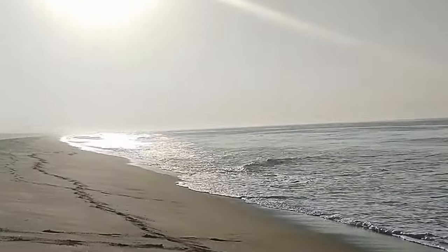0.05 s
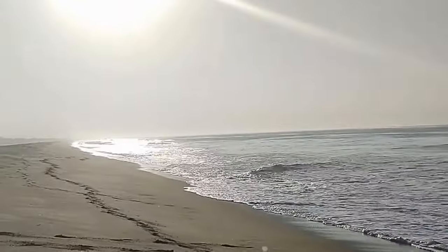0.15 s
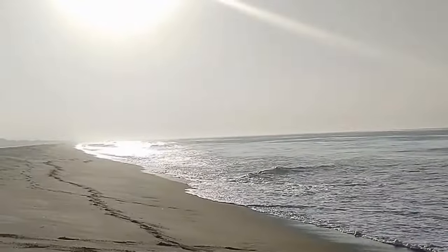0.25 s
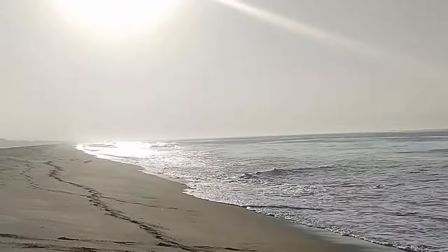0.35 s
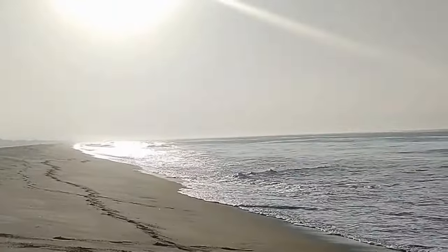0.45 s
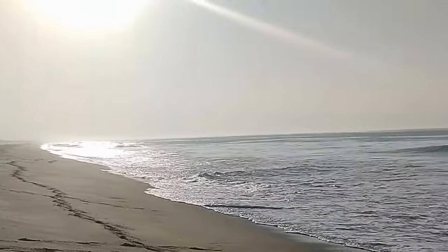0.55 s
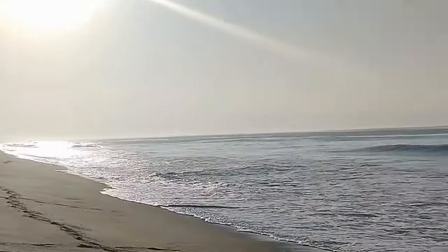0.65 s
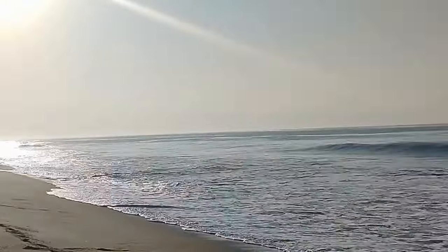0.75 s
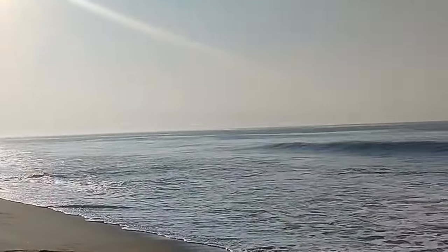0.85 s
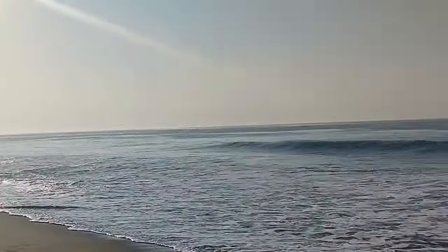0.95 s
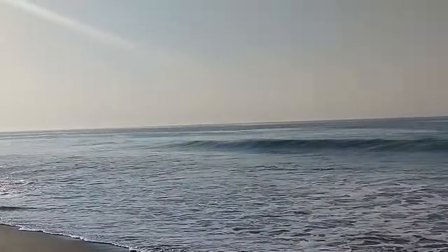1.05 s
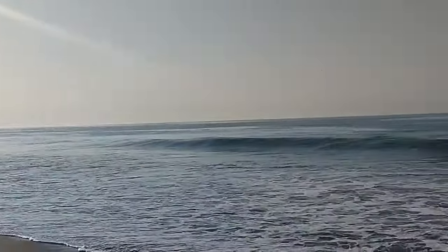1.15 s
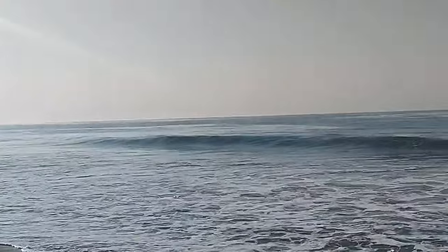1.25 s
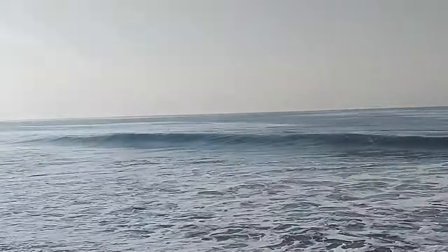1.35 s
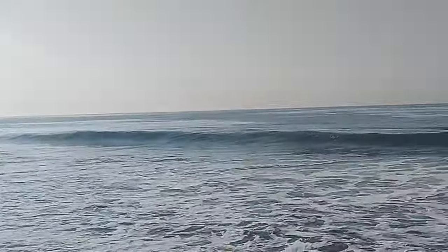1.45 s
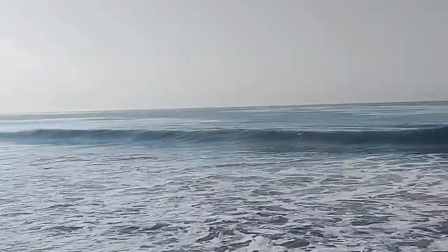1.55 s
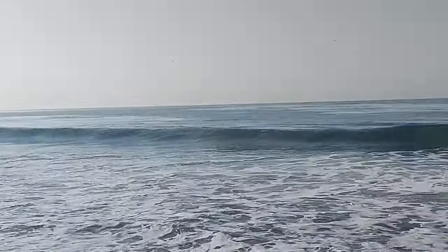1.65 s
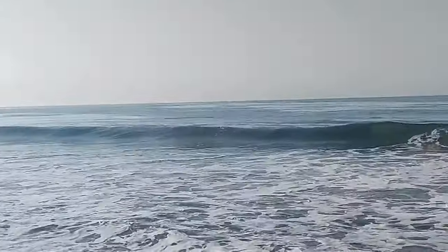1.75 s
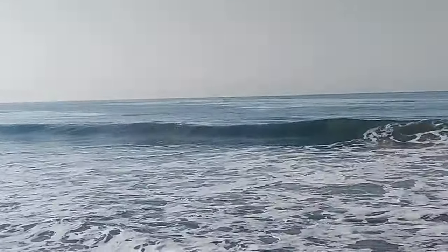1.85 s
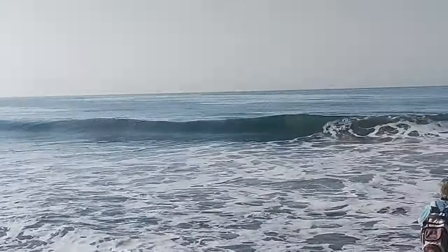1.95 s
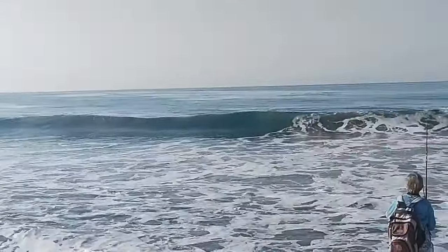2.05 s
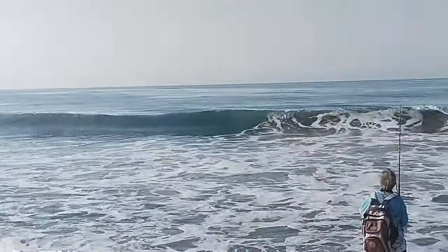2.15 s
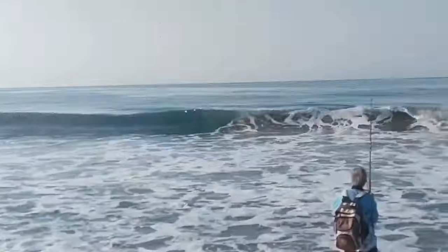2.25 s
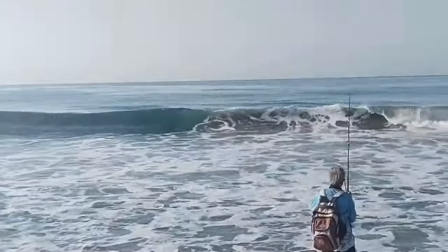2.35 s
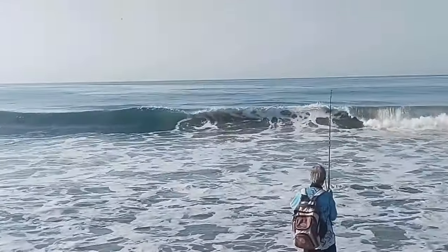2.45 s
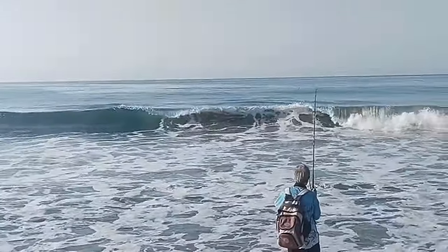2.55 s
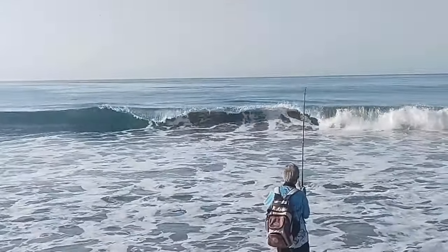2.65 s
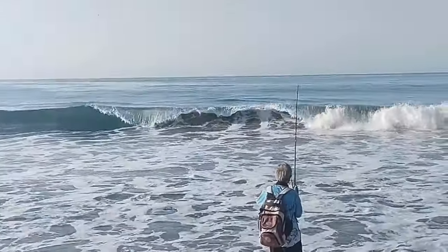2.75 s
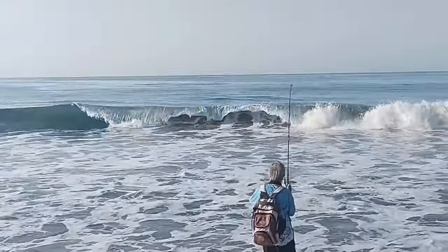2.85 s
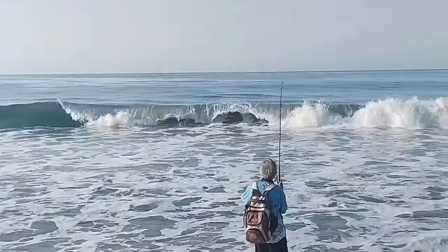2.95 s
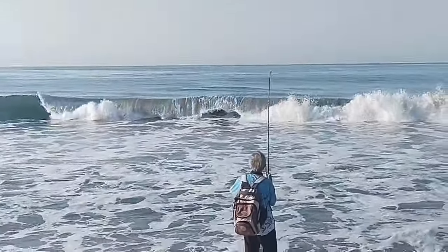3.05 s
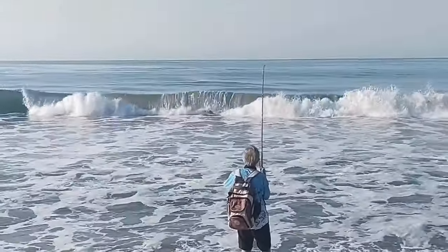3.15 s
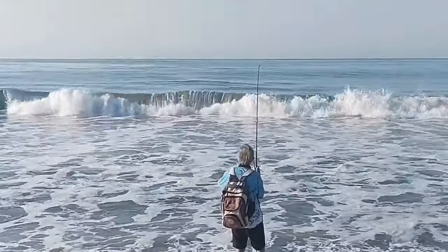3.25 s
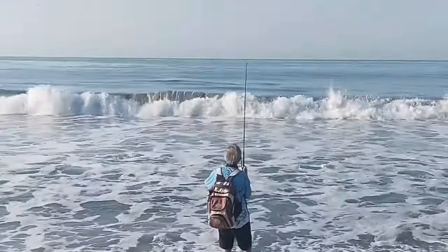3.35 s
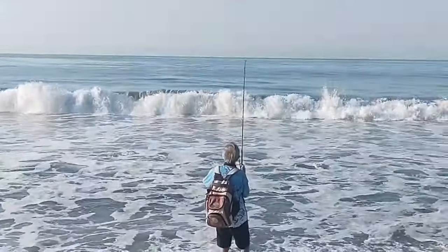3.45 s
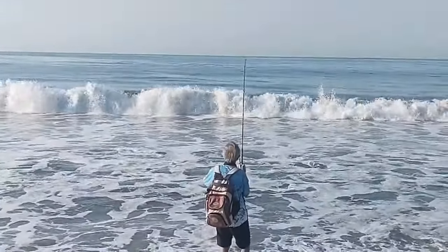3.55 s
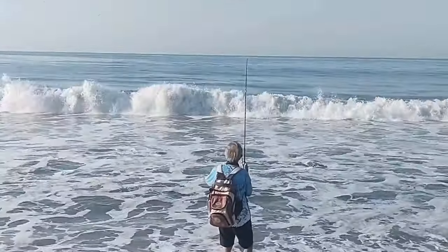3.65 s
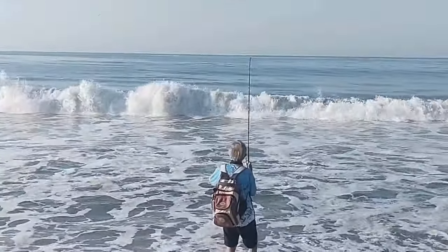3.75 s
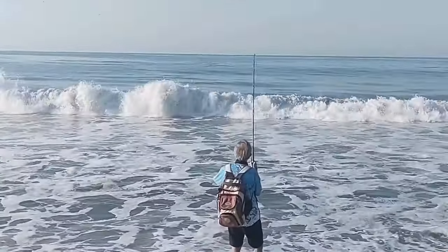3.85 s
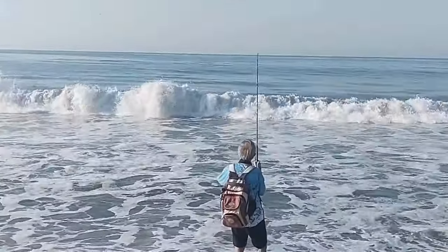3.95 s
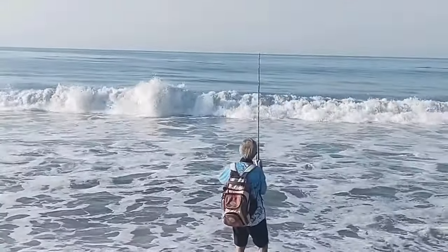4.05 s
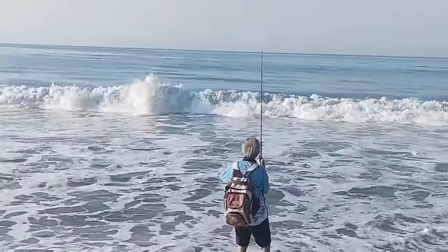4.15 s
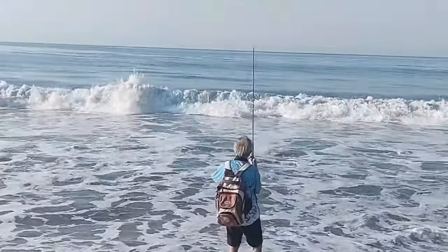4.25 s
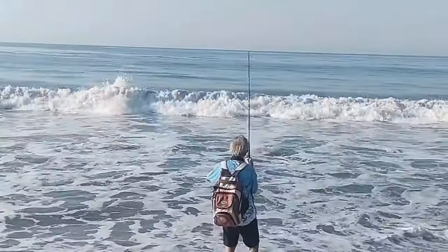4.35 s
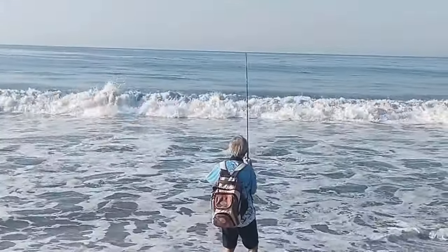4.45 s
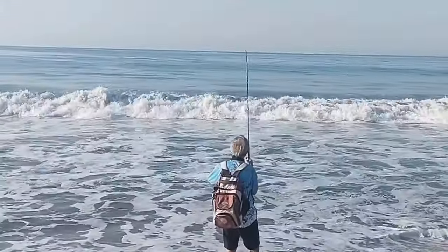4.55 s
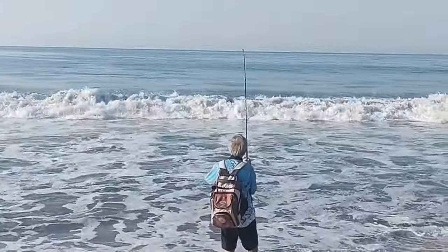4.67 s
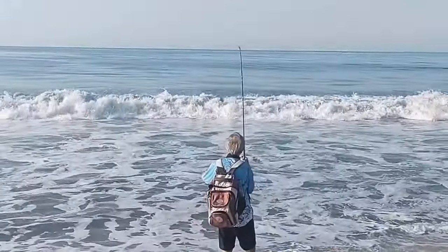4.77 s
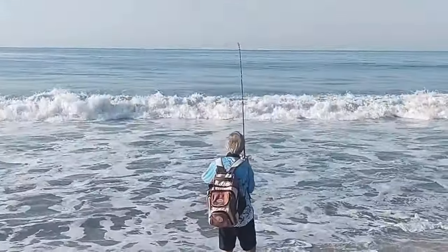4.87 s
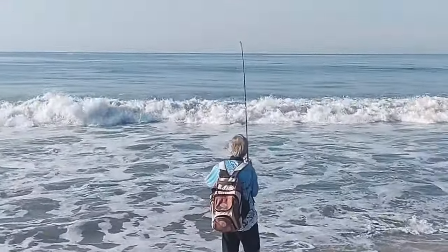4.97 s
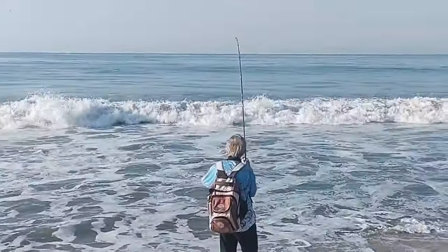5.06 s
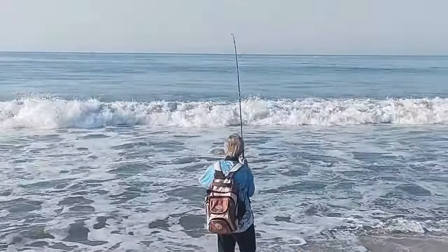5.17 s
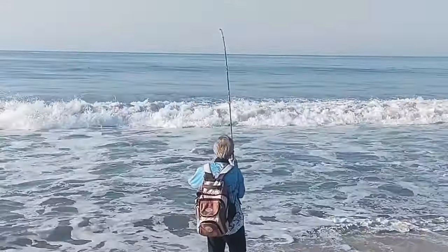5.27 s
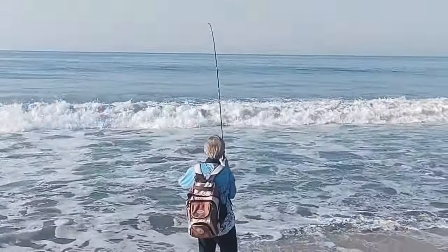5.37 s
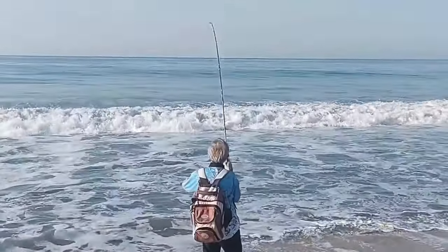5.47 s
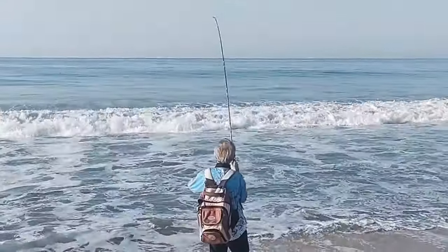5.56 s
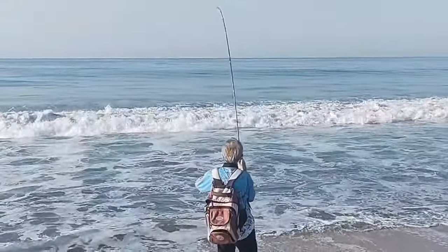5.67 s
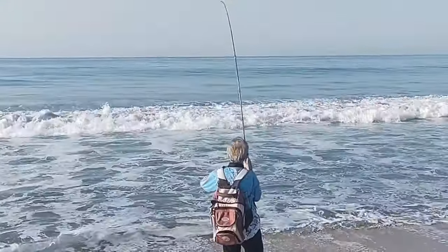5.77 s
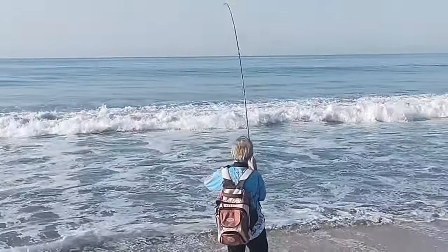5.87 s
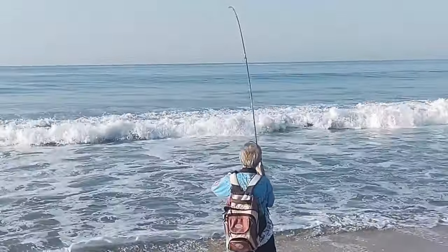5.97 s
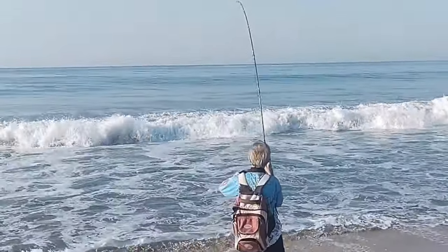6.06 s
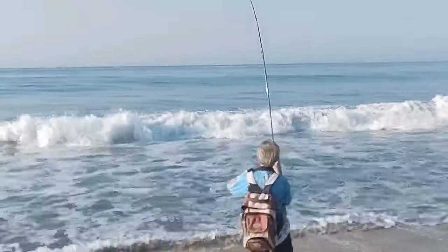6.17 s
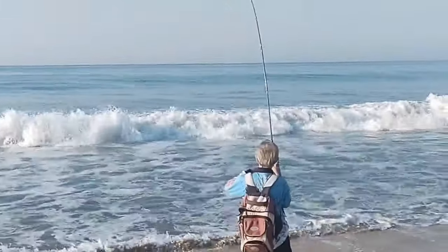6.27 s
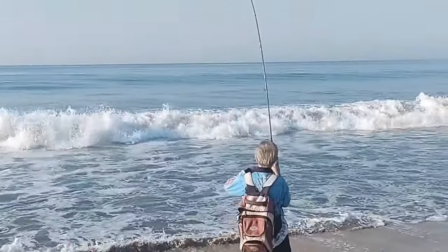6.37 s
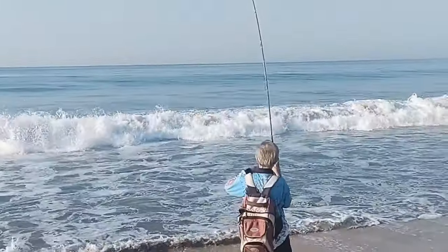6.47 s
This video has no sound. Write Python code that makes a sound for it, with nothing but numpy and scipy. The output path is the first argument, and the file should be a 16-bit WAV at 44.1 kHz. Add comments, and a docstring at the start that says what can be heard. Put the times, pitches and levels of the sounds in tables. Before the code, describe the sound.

Quiet hush of distant surf and light wind, then a wave gurgles, crashes with dull thuds, rolls in foaming, and fizzing water runs up sand.

```python
"""A low hush of far breakers with a dying hiss and light wind opens the scene on a flat sandy beach.
A wave trickles and spills at its crest, gurgles, plunges with thuds and rolls in as white water.
Then a thin fizzing swash runs up the sand on the right. Water and wind are shaped stereo noise;
thuds are decaying sines, the gurgle a gliding narrow band, the pops random clicks.
The wet sand mirrors the breaker with a moving delay that hollows its sound."""
import sys
import numpy as np
from scipy import signal
from scipy.fft import rfft, irfft, next_fast_len
from scipy.io import wavfile
from scipy.ndimage import uniform_filter1d, map_coordinates

SR = 44100
rng = np.random.default_rng(int(sys.argv[2]) if len(sys.argv) > 2 else 0)


def unload_wav(signal):
    """Save mono or channel-first audio to the path in sys.argv[1] as 16-bit WAV at rate SR, clipped to [-1, 1]."""
    wavfile.write(
        sys.argv[1],
        SR,
        np.round(np.clip(np.atleast_2d(signal).T, -1, 1) * 32767).astype(np.int16),
    )


N = 287091

# bearing of the loudest water, travelling to the right: time_s, left_lead_ms
BEARING = [(2.35, 0.13), (3, -0.266), (3.4, -0.24), (3.85, -0.43), (4.25, -0.56), (4.6, -0.41), (6.5, -0.6)]
# likeness of the two ports: frequency_hz, correlation (0-1)
LIKENESS = [(250, 0.7), (350, 0.82), (550, 1), (780, 0.63), (1050, 0.48), (2000, 0.1), (3500, 0),
            (5500, 0.1), (7000, 0.6), (10000, 0.98)]
# relative noise spectra of drops, large bubbles and fine foam: frequency_hz, density_db
SPATTER_SPECTRUM = [(1000, -8.5), (1350, 1.5), (1680, -0.5), (1950, 4.5), (2300, 1.5), (2750, -2.5),
                    (3000, -14), (3500, -20.5), (4300, -24.5), (7000, -28.5), (12000, -39)]
CHURN_SPECTRUM = [(230, -12.5), (360, -1.8), (480, 0.4), (620, 0), (800, -1), (1000, -7.5), (1200, -10),
                  (1600, -21)]
FIZZ_SPECTRUM = [(3500, -17), (4300, -10), (5100, -0.5), (6800, 2), (8500, -3), (11000, -7.5), (15000, -10),
                 (16000, -26.5)]
# the crest spills over three times, its body louder each time: start_s, length_s, body_db, spatter_db
SPILLS = [(1.34, 0.31, -46.5, -51), (1.67, 0.19, -41, -40), (1.87, 0.13, -35.5, -51)]
# sections of the lip hit the water: start_s, length_s, churn_db, splash_db, spray_db
FALLS = [(2.355, 0.23, -39, -47.5, -67), (2.53, 0.13, -39, -51, -62.5), (2.98, 0.094, -36, -48.5, -62),
         (3.09, 0.34, -36.5, -45.5, -63.5), (3.25, 0.05, -36, -44, -52.5), (3.45, 0.13, -39.5, -48.5, -63),
         (3.84, 0.027, -34.5, -41.5, -61), (3.97, 0.26, -36, -44.5, -59), (4.06, 0.17, -36.5, -42.5, -55),
         (4.3, 0.12, -34, -39.5, -51.5), (4.53, 0.064, -37.5, -48, -51.5)]
# surges that overrun the sheet of water: start_s, length_s, wash_db, fizz_db, froth_db
SURGES = [(4.07, 0.23, -42.5, -54, -57), (4.3, 0.19, -41, -54, -55.5), (4.5, 0.06, -34.5, -53, -59),
          (5.17, 0.11, -47, -53.5, -73), (5.5, 0.05, -58, -61, -76), (6.32, 0.23, -41, -66, -67)]

# wave lands, its air pocket collapses, only rolling white water is left
LANDING_S, COLLAPSE_S, SPENT_S = 2.345, 2.45, 4.33
# the sheet reaches the sand and spreads
SWASH_S, SWASH_SPREAD_S = 3.74, 0.62
FALL_ATTACK_S, FALL_DB_PER_S = 0.024, 68
SPILL_ATTACK_S, SPILL_FALL_DB_PER_S = 0.21, 34
SURGE_ATTACK_S, SURGE_FALL_DB_PER_S = 0.05, 66


def amp(db):
    """Decibels to gain."""
    return 10 ** (np.asarray(db) / 20)


def unit(x):
    """Scale to rms 1."""
    return x / np.sqrt(np.mean(x ** 2) + 1e-20)


def along(points, hz):
    """(Hz, value) points read on a log frequency axis."""
    f, v = np.transpose(points)
    return np.interp(np.log(hz + 1), np.log(f + 1), v)


def curves(rows):
    """One value per sample for each column after the time."""
    s, *cols = np.transpose(rows)
    return [np.interp(np.arange(N) / SR, s, c) for c in cols]


def since(at_s):
    """Seconds gone by since a time; 0 before it."""
    return np.maximum(np.arange(N) / SR - at_s, 0)


def fade_in(at_s, length_s):
    """Smooth tanh step from 0 to 1, centred on a time."""
    return .5 + .5 * np.tanh((np.arange(N) / SR - at_s) / length_s)


def swell(start_s, length_s, attack_s, fall_db_per_s):
    """Attack centred on the start, hold, release at a steady dB rate."""
    return fade_in(start_s, attack_s) * amp(-fall_db_per_s * since(start_s + length_s))


def swells(events, attack_s, fall_db_per_s):
    """One envelope per level column of (start, length, dB, ..) rows; overlaps add in power."""
    rows = np.array(events)
    shapes = np.array([swell(start_s, length_s, attack_s, fall_db_per_s)
                       for start_s, length_s in rows[:, :2]])
    powers = amp(rows[:, 2:].T) ** 2
    return np.sqrt(powers @ shapes ** 2)


def wobble(knots_per_s):
    """Smooth random curve: a spline through normal random knots."""
    knots = rng.standard_normal(int(N * knots_per_s / SR) + 4)
    return map_coordinates(knots, [np.arange(N) * knots_per_s / SR])


def filtered(x, response):
    """x times a zero-phase response of frequency."""
    m = next_fast_len(N + SR // 2)
    return irfft(rfft(x, m) * response(np.fft.rfftfreq(m, 1 / SR)), m)[..., :N]


def brightened(pair, edge_hz, gain):
    """The part above an edge follows its own gain."""
    low = filtered(pair, lambda hz: 1 / (1 + (hz / edge_hz) ** 12))
    return low + gain * (pair - low)


def colour(spectrum, hz):
    """Gain of a spectrum that falls away steeply beyond its ends."""
    skirts = np.minimum(hz / spectrum[0][0], 1) * np.minimum(spectrum[-1][0] / (hz + 1), 1)
    return amp(along(spectrum, hz)) * skirts ** 4


def rush(spectrum, alike, patchy_db):
    """Stereo noise of rms 1 in patches: bubble clouds of different sizes come and go."""
    z = signal.stft(rng.standard_normal((2, N)), nperseg=512)[2]
    field = uniform_filter1d(rng.standard_normal(z.shape[1:]), size=7, axis=0)
    field = uniform_filter1d(field, size=14, axis=1)
    pair = signal.istft(z * amp(patchy_db * unit(field)), nperseg=512)[1][:, :N]

    def mid_side_gains(hz):
        # splitting power by this angle gives the wanted correlation
        angle = np.arccos(np.clip(along(alike, hz), -1, 1)) / 2
        return colour(spectrum, hz) * np.array([np.cos(angle), np.sin(angle)])

    mid, side = filtered(pair, mid_side_gains)
    return unit(np.array([mid + side, mid - side]))


def delayed(x, ms):
    """One channel, late by a time that may move."""
    return map_coordinates(x, [np.arange(N) - ms * SR / 1000], mode="mirror")


def arriving(pair, left_lead_ms):
    """Sound from one side reaches the nearer port first."""
    return np.array([delayed(pair[0], -left_lead_ms / 2), delayed(pair[1], left_lead_ms / 2)])


def plunge(level_db=2, tumble_db=-49.0, build_s=0.072, settling_db_per_s=10.0,
           shatter_s=2.5, shatter_rise_s=0.064):
    """The falling lip splashes over the tumbling front, brighter once it shatters into drops."""
    # relative spectrum: frequency_hz, density_db
    splash_spectrum = [(850, -15), (1170, 3.5), (1380, 1), (1560, -1), (1750, -3), (2050, 3.5),
                       (2350, -2.5), (2630, 1), (2920, -3.5), (3200, -4), (3700, -7.5), (4150, -11.5),
                       (4600, -27), (6000, -55)]
    _, falls, _ = swells(FALLS, FALL_ATTACK_S, FALL_DB_PER_S)
    tumble = amp(tumble_db) * swell(COLLAPSE_S, SPENT_S - COLLAPSE_S, build_s, settling_db_per_s)
    water = rush(splash_spectrum, [(1000, 0.41), (1500, 0.13), (4000, 0.44)], patchy_db=1)
    water = brightened(water, 3400, fade_in(shatter_s, shatter_rise_s))
    splash = amp(level_db) * np.hypot(tumble, falls) * water
    return arriving(splash, curves(BEARING)[0])


def roller(level_db=-37.5, nearing_db_per_s=1.0, landing_s=0.024, width=0.54,
           small_db=2, merging_db_per_s=1, small_hz=650):
    """Large bubbles churn along the whole nearing front, so near the middle; each fall adds more."""
    falls, _, _ = swells(FALLS, FALL_ATTACK_S, FALL_DB_PER_S)
    rolling = amp(level_db + nearing_db_per_s * since(LANDING_S))
    bubbles = rush(CHURN_SPECTRUM, LIKENESS, patchy_db=0.5)
    # the freshly broken wave is rich in smaller bubbles, which thin out as it rolls on
    small = bubbles - filtered(bubbles, lambda hz: 1 / (1 + (hz / small_hz) ** 6))
    fresh = amp(small_db - merging_db_per_s * since(LANDING_S))
    churn = np.hypot(rolling, falls) * (bubbles + (fresh - 1) * small)
    return arriving(churn, width * curves(BEARING)[0]) * fade_in(LANDING_S, landing_s)


def thuds(attack_s=0.003, cycles_to_60_db_down=11, rough_rad=0.39, slap_db=-13, slap_s=0.0062):
    """Collapsing air pockets throb unevenly for a few cycles, under a short slap of water."""
    # pockets of trapped air: start_s, pitch_hz, level_db
    pockets = [(2.466, 230, -28), (2.515, 200, -12.5), (2.536, 90, -16), (2.638, 600, -15),
               (3.192, 200, -17), (3.269, 950, -9), (3.391, 218.4, -21), (3.46, 150, -17.5),
               (4.133, 119, -17.5), (4.313, 170, -17.5), (4.343, 109.8, -17.5), (4.401, 115, -26),
               (4.625, 131.7, -21)]
    throbs, slaps = np.zeros(N), np.zeros(N)
    for start_s, hz, db in pockets:
        t = since(start_s)
        blow = amp(db) * (1 - np.exp(-t / attack_s))
        ring = np.exp(-np.log(1000) * hz * t / cycles_to_60_db_down)
        throbs += blow * ring * np.sin(2 * np.pi * hz * t + rough_rad * wobble(hz))
        slaps += blow * np.exp(-t / slap_s)
    return throbs + amp(slap_db) * slaps * rush(CHURN_SPECTRUM, LIKENESS, patchy_db=0)


def crest(spill_db=0, spatter_db=-1.0, trickle_db=-58, steepens_s=1.05, ragged_db=0.94,
          spatter_attack_s=0.099, spatter_fall_db_per_s=26):
    """The steepening crest trickles, then spills and spatters raggedly until the wave falls."""
    # relative spectrum: frequency_hz, density_db
    spill_spectrum = [(280, -4.5), (420, -5), (640, 1), (900, -4.5), (1150, -5.5), (1500, -16), (4300, -35),
                      (7500, -40.5), (10000, -55), (15000, -45)]
    trickle = amp(trickle_db) * fade_in(steepens_s, 0.2)
    spilling, _ = swells(SPILLS, SPILL_ATTACK_S, SPILL_FALL_DB_PER_S)
    _, spattering = swells(SPILLS, spatter_attack_s, spatter_fall_db_per_s)
    body = rush(spill_spectrum, [(600, 0.86), (1200, 0.42), (4500, 0.2), (9000, 0.96)], patchy_db=1)
    body = amp(spill_db) * np.hypot(trickle, spilling) * body
    drops = rush(SPATTER_SPECTRUM, [(1500, 0.44), (3000, 0.16), (5000, 0.13), (8000, 0.87)],
                 patchy_db=1.5)
    ragged = amp(spatter_db + ragged_db * wobble(55.15))
    drops = ragged * np.hypot(trickle, spattering) * drops
    return (body + drops) * (1 - fade_in(COLLAPSE_S, 0.031))


def curl(start_s=1.6, length_s=0.46, from_hz=1530, to_hz=1760, glide_s=0.12, level_db=-43.5,
         fading_db_per_s=7, knots_per_s=180, attack_s=0.015, fall_db_per_s=120, right_db=-3):
    """Like-sized bubbles gurgle in a narrow band under the lip; it rises and fades as they break up."""
    hz = to_hz + (from_hz - to_hz) * np.exp(-since(start_s) / glide_s)
    phase = 2 * np.pi * np.cumsum(hz) / SR
    # slow random weights on cosine and sine make a narrow noise band, drawn anew for each port
    gurgle = unit(np.array([wobble(knots_per_s) * np.cos(phase) + wobble(knots_per_s) * np.sin(phase)
                            for port in range(2)]))
    level = amp(level_db - fading_db_per_s * since(start_s))
    level = level * swell(start_s, length_s, attack_s, fall_db_per_s)
    return level * gurgle * amp([[0], [right_db]])


def boom(calm_db=-49, spill_db=-4, broken_db=-29.0, fill_s=0.07):
    """Big clouds of trapped air throb as the wave collapses; such long waves reach both ports alike."""
    # relative spectrum: frequency_hz, density_db
    cloud_spectrum = [(25, -28), (45, -22.5), (68, -6.5), (108, -1), (184, 0.5), (250, -2), (325, -10),
                      (400, -10)]
    spilling, _ = swells(SPILLS, SPILL_ATTACK_S, SPILL_FALL_DB_PER_S)
    unbroken = np.hypot(amp(calm_db), amp(spill_db) * spilling)
    filled = np.sqrt(1 - np.exp(-since(LANDING_S) / fill_s))
    broken = amp(broken_db) * filled * fade_in(COLLAPSE_S, 0.3)
    clouds = rush(cloud_spectrum, [(60, 1.0), (200, 0.97), (350, 0.9)], patchy_db=0.52)
    return np.hypot(unbroken, broken) * clouds


def spray(level_db=1, hanging_db=-62.5, build_s=0.077, settling_db_per_s=25,
          rise_s=0.033, fall_db_per_s=93):
    """Fine drops thrown up by each fall hiss high above the sand, and settle once the wave is spent."""
    # relative spectrum: frequency_hz, density_db
    mist_spectrum = [(3000, -27), (3900, 0), (5000, 5.5), (6300, 4), (8500, -3.5), (11000, -11.5),
                     (13000, -17), (15500, -16)]
    _, _, thrown = swells(FALLS, rise_s, fall_db_per_s)
    hanging = amp(hanging_db) * swell(LANDING_S, SPENT_S - LANDING_S, build_s, settling_db_per_s)
    mist = rush(mist_spectrum, LIKENESS, patchy_db=1)
    return amp(level_db) * np.hypot(hanging, thrown) * mist


def over_sand(pair, smooth_hz=3000, right_share=.8, waver=.007, flicker_db=1):
    """Mirror image in wet sand: a wavering comb, fainter at right; ripples scatter the treble away."""
    # mean mirror path: time_s, delay_ms, strength (0-1)
    mirror_path = [(1.1, 1.7, 0.3), (1.6, 1.66, 0.14), (1.95, 1.72, 0.38), (2.2, 1.79, 0.56),
                   (2.45, 1.9, 0.53), (3, 1.9, 0.66), (3.7, 1.99, 0.54), (4.2, 1.83, 0.38), (4.8, 2, 0.46)]
    ms, strength = curves(mirror_path)
    ms = ms * (1 + waver * wobble(8))
    strength = strength * amp(flicker_db * wobble(11)) * np.array([[1], [right_share]])
    low = filtered(pair, lambda hz: 1 / (1 + (hz / smooth_hz) ** 16))
    image = strength * np.array([delayed(x, ms) for x in low])
    # the division keeps the mean power of direct plus image
    return pair - low + (low + image) / np.sqrt(1 + strength ** 2)


def wash(sheet_db=-37.0, slowing_db_per_s=0.94, shallow_db=-7, deepening_db_per_s=4, deep_hz=1600,
         left_lead_ms=-0.558, stalls_s=5.37, thinning_db_per_s=7, fine_hz=2950):
    """Water surges up the sand at right; larger bubbles take over, the finest die out as it stalls."""
    # relative spectrum: frequency_hz, density_db
    wash_spectrum = [(650, -20), (950, 2), (1330, 6.5), (1800, 0.5), (2150, 1), (2700, -3), (3300, -8.5),
                     (3800, -11.5), (4300, -23.5), (6000, -26.5)]
    surges, _, _ = swells(SURGES, SURGE_ATTACK_S, SURGE_FALL_DB_PER_S)
    running = amp(sheet_db - slowing_db_per_s * since(SWASH_S)) * fade_in(SWASH_S, SWASH_SPREAD_S)
    flow = np.hypot(running, surges)
    thinned = running * amp(-thinning_db_per_s * since(stalls_s))
    fine = np.hypot(thinned, surges) / (flow + 1e-12)
    water = rush(wash_spectrum, [(1000, 0.33), (2000, 0.35), (4000, 0.22)], patchy_db=0.5)
    sheet = brightened(water, fine_hz, fine)
    deep = filtered(sheet, lambda hz: 1 / (1 + (hz / deep_hz) ** 6))
    depth = amp(shallow_db + deepening_db_per_s * since(SWASH_S))
    return arriving(flow * (sheet + (depth - 1) * deep), left_lead_ms)


def bursting(count, spread_db):
    """Clicks of tiny bubbles, each of its own size and place."""
    when, side, size = rng.random((count, 3)).T
    clicks = amp(spread_db * size) * rng.choice([-1, 1], count)
    at = (when * N).astype(int)
    pair = np.array([np.bincount(at, clicks * np.sqrt(share), N) for share in (side, 1 - side)])
    return unit(filtered(pair, lambda hz: colour(FIZZ_SPECTRUM, hz)))


def foam(level_db=-2.0, sheet_db=-54, draining_db_per_s=3.5, lag_s=0.29, pops_db=-8,
         clusters_db=2, froth_db=-6, fizz_fall_db_per_s=28):
    """Foam hisses and pops in clusters over coarser froth; surges renew both, then they drain away."""
    # relative spectrum: frequency_hz, density_db
    froth_spectrum = [(4000, -18), (4500, -2), (5150, 1), (6300, -9)]
    _, surges, _ = swells(SURGES, SURGE_ATTACK_S, fizz_fall_db_per_s)
    _, _, frothing = swells(SURGES, SURGE_ATTACK_S, SURGE_FALL_DB_PER_S)
    start_s = SWASH_S + lag_s
    lying = amp(sheet_db - draining_db_per_s * since(start_s)) * fade_in(start_s, SWASH_SPREAD_S)
    hiss = rush(FIZZ_SPECTRUM, LIKENESS, patchy_db=1.7)
    pops = unit(amp(clusters_db * wobble(23)) * bursting(count=4000, spread_db=35))
    fizz = unit(hiss + amp(pops_db) * pops)
    froth = np.hypot(amp(froth_db) * lying, frothing) * rush(froth_spectrum, LIKENESS, patchy_db=2)
    return amp(level_db) * np.hypot(lying, surges) * fizz + froth


def far_surf(level_db=-53, dying_db=-62, dying_s=0.24, hiss_db=-72, hiss_s=0.45):
    """Far breakers, their lows from the left; one is just dying away and its foam hisses on."""
    # relative spectra: frequency_hz, density_db
    hush_spectrum = [(250, -8.5), (430, -8), (600, -13), (760, -19.5), (930, -28.5), (1200, -22.5),
                     (1500, -21.5), (2300, -24), (2800, -30.5), (3400, -36.5), (5200, -39.5), (7000, -47),
                     (10600, -51), (15500, -53)]
    foam_spectrum = [(3000, 1), (4200, -3), (5300, -7), (6300, -7)]
    # likeness of the two ports: frequency_hz, correlation (0-1)
    far_likeness = [(250, 0.9), (500, 0.42), (900, 0.38), (5000, 0.052), (7000, .85), (12000, 1)]
    hush = rush(hush_spectrum, far_likeness, patchy_db=1.0)
    low = filtered(hush, lambda hz: hz < 4000)
    dying = amp(dying_db) * np.exp(-since(0) / dying_s)
    dying = dying * rush(SPATTER_SPECTRUM, far_likeness, patchy_db=3.5)
    hiss = amp(hiss_db) * np.exp(-since(0) / hiss_s) * rush(foam_spectrum, far_likeness, patchy_db=.5)
    return amp(level_db) * (arriving(low, 0.32) + hush - low) + dying + hiss


def wind(breeze_db=-53.5, attack_s=0.053, fall_db_per_s=57, lumps_db=0.5, lee_db=-13):
    """Gusts and puffs on a light breeze buffet the left port in lumps; the right lies in the lee."""
    # gusts and sharp puffs at the windward port: start_s, length_s, level_db
    gust_rows = [(.17, 0.27, -51), (.44, 0.061, -48), (.67, 0.025, -38.5), (.98, 0.22, -44),
                 (2.17, 0.79, -42), (2.92, 0.15, -34.5), (3.82, 0.058, -27.5), (4.08, 0.042, -25),
                 (4.29, 0.14, -24), (4.55, 0.2, -28.5), (4.9, 0.15, -31.5), (5.24, 0.1, -26),
                 (5.79, 0.37, -28.5), (6.33, 0.1, -31)]
    puff_rows = [(.517, 0.0093, -35), (.73, 0.01, -43), (1.035, 0.0091, -45), (1.547, 0.01, -41)]
    # relative spectrum: frequency_hz, density_db
    buffet_spectrum = [(25, -49), (50, -9.5), (90, 5), (150, 3), (230, -8.5), (320, -3), (500, -15),
                       (750, -39)]
    gusts, = swells(gust_rows, attack_s, fall_db_per_s)
    puffs, = swells(puff_rows, attack_s=.004, fall_db_per_s=450)
    lumps = amp(lumps_db * np.array([wobble(31), wobble(28)]))
    buffet = unit(lumps * rush(buffet_spectrum, [(100, 0.033)], patchy_db=0.0))
    return (np.hypot(amp(breeze_db), gusts) + puffs) * buffet * amp([[0], [lee_db]])


def scene():
    """The breaker over the sand, with swash, far surf and wind around it."""
    breaker = over_sand(plunge() + roller() + crest())
    breaker = breaker + thuds() + curl() + boom() + spray()
    return breaker + wash() + foam() + far_surf() + wind()


def record(dry, top_hz=15750):
    """The two ports colour the sound differently; nothing passes above the band limit."""
    # port difference, the left stronger in the presence range: frequency_hz, left_minus_right_db
    port_difference = [(150, 0.2), (400, -1.5), (750, 2.2), (1000, 1), (1400, 4.5), (2000, 11.5),
                       (2700, 5.5), (3800, -0.5), (5500, 4.5), (8000, 0.5), (13000, -2)]
    return filtered(dry, lambda hz: amp(np.outer([.5, -.5], along(port_difference, hz))) * (hz < top_hz))


dry = scene()
out = record(dry)
unload_wav(out)
```